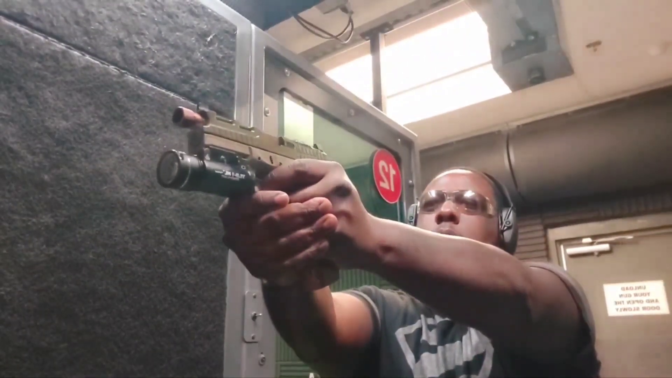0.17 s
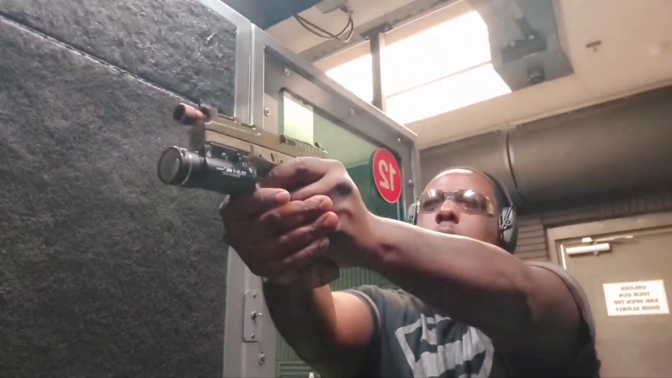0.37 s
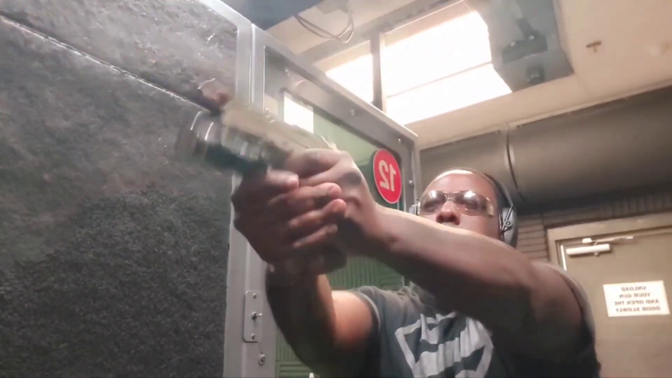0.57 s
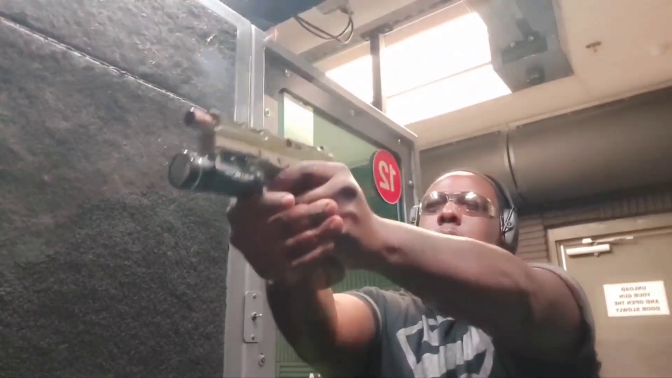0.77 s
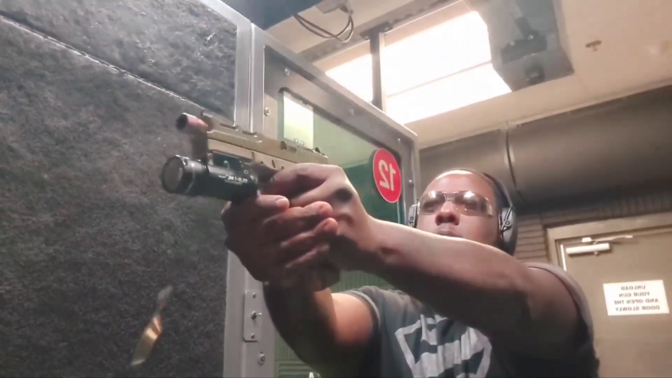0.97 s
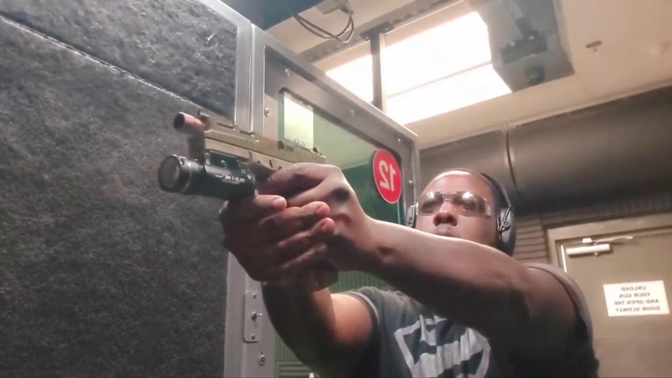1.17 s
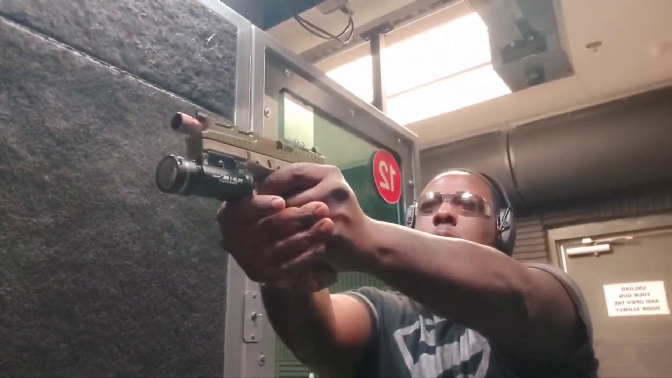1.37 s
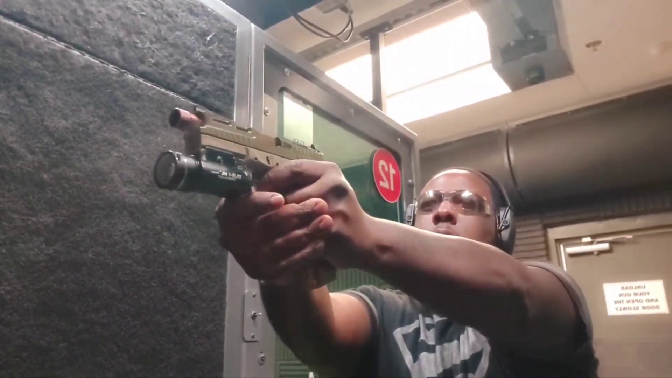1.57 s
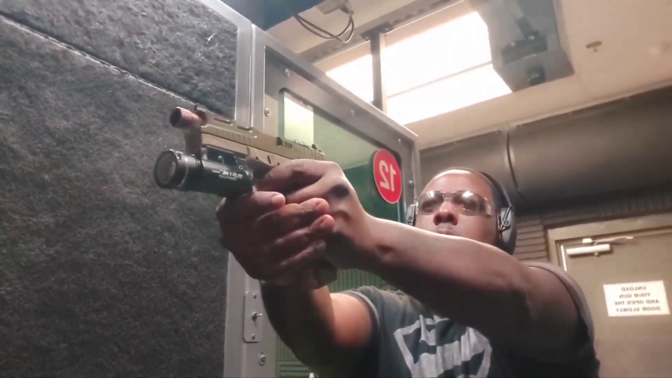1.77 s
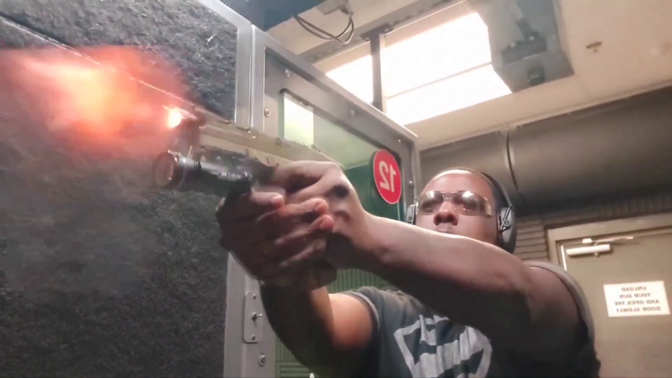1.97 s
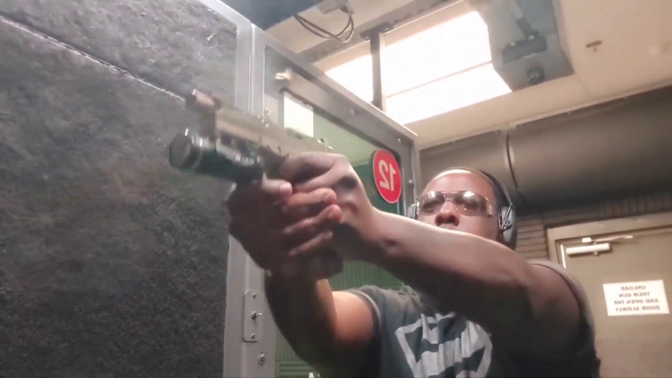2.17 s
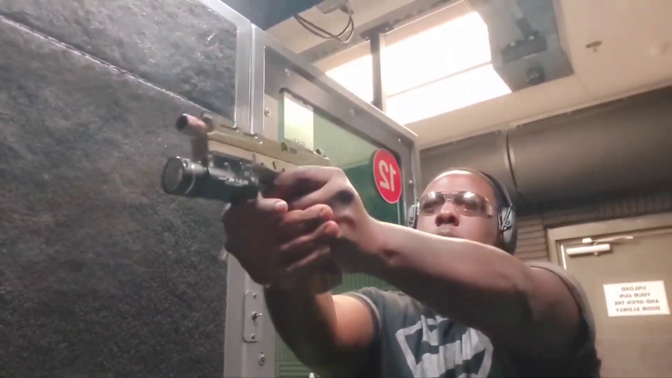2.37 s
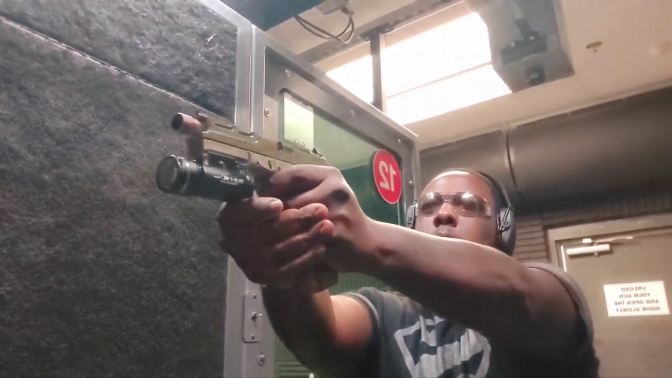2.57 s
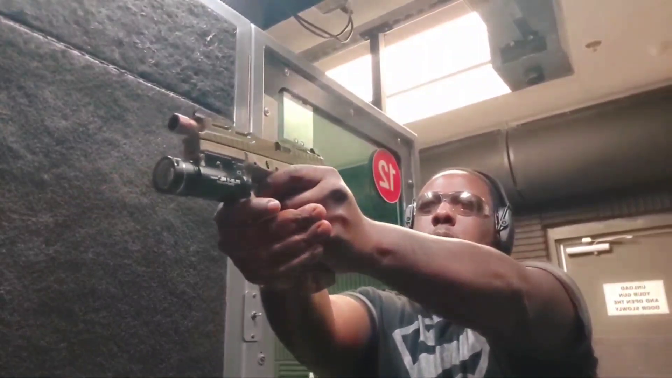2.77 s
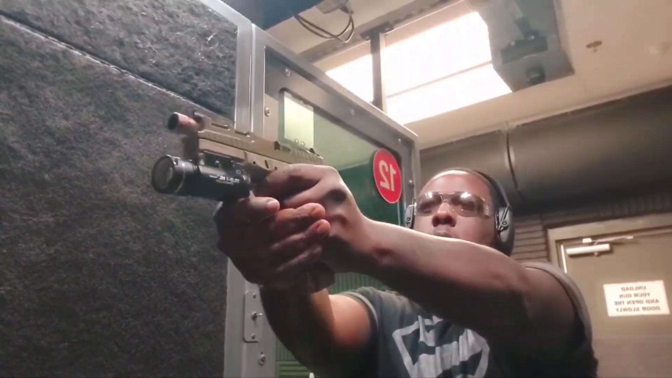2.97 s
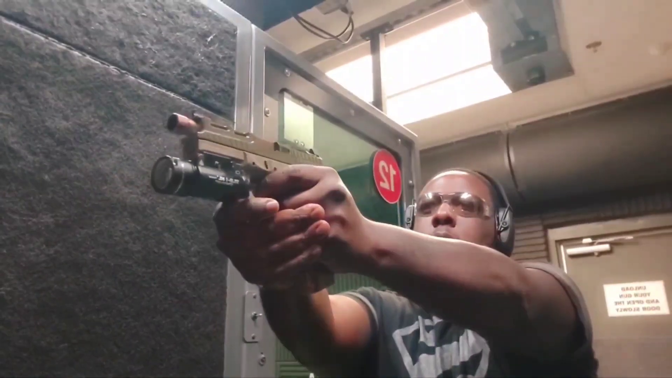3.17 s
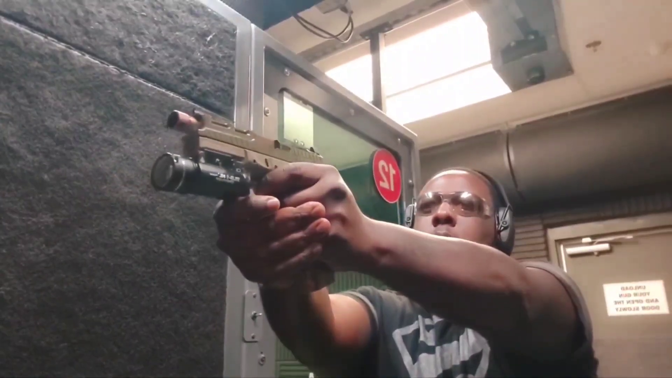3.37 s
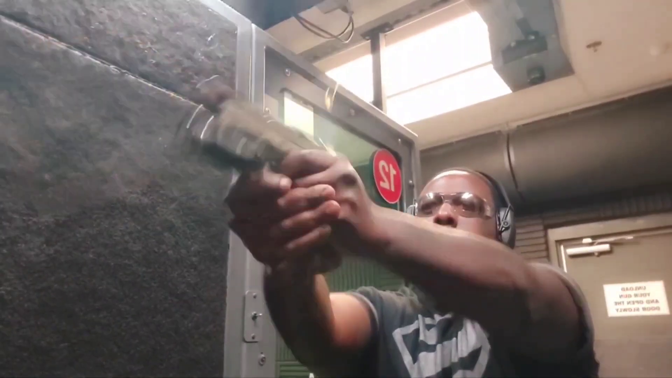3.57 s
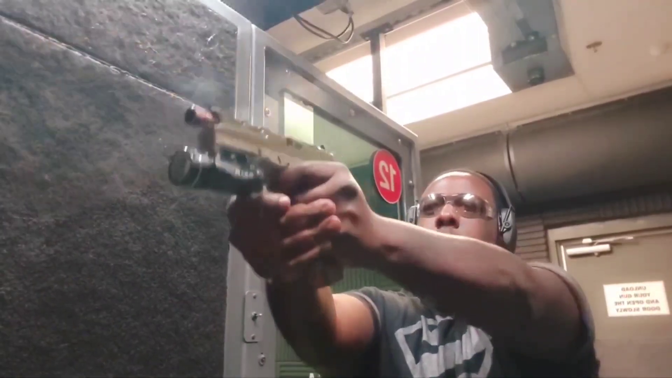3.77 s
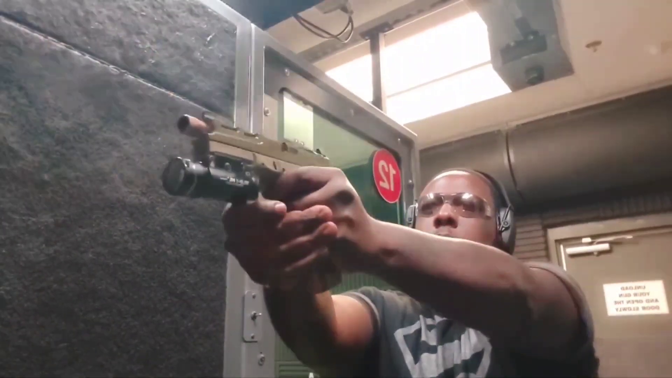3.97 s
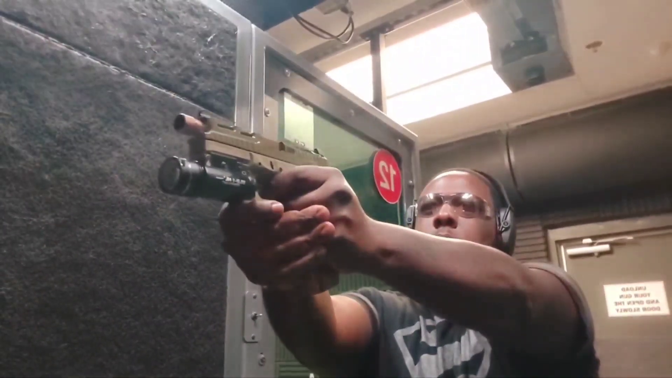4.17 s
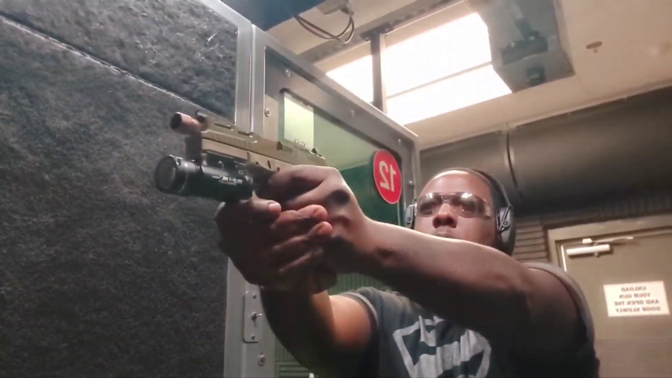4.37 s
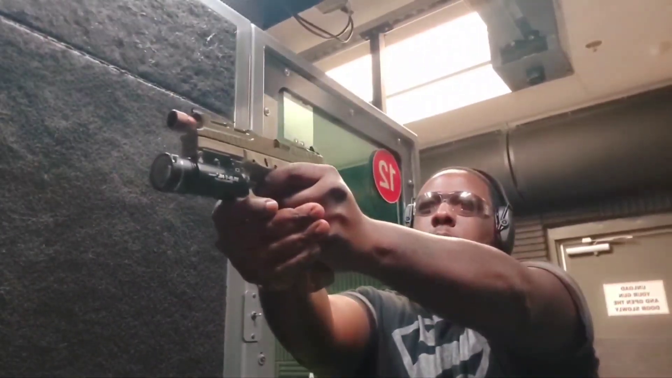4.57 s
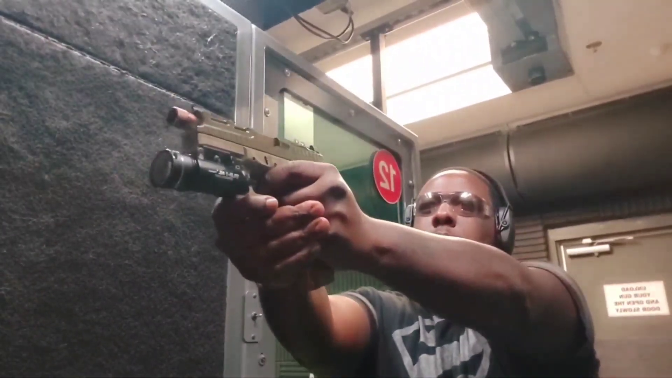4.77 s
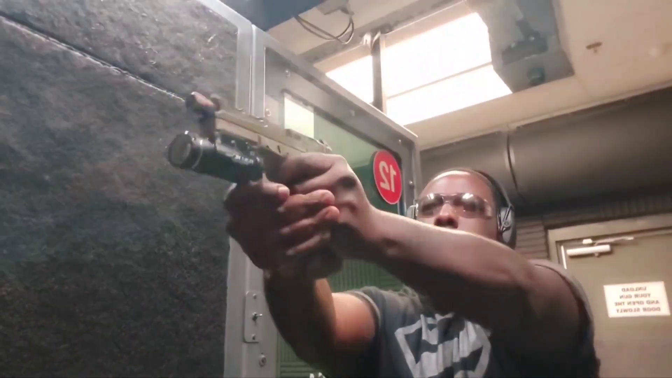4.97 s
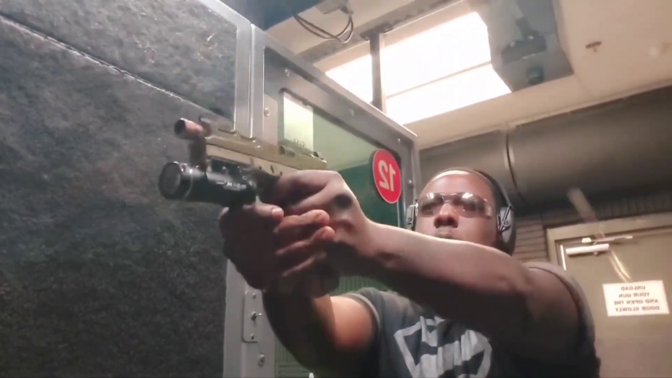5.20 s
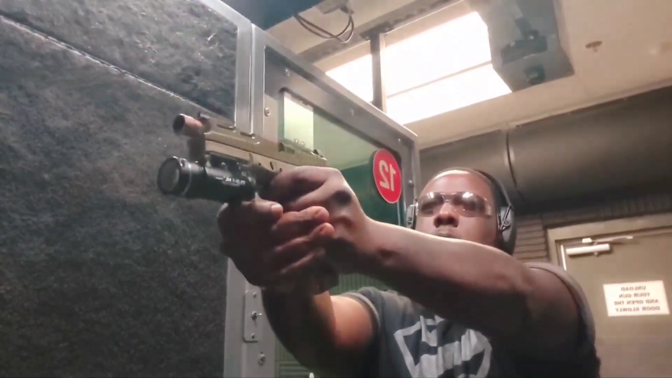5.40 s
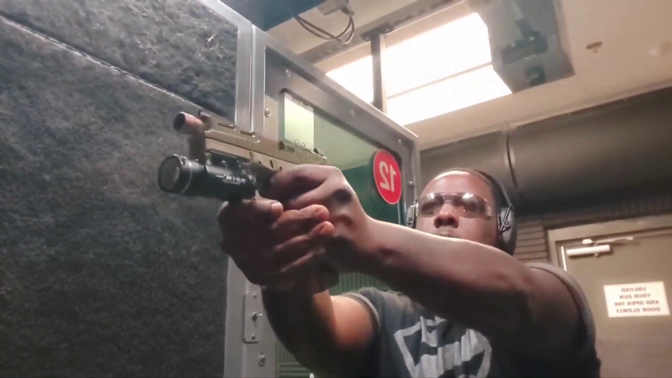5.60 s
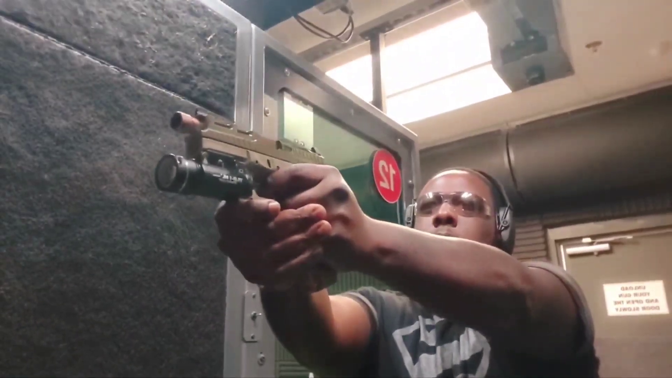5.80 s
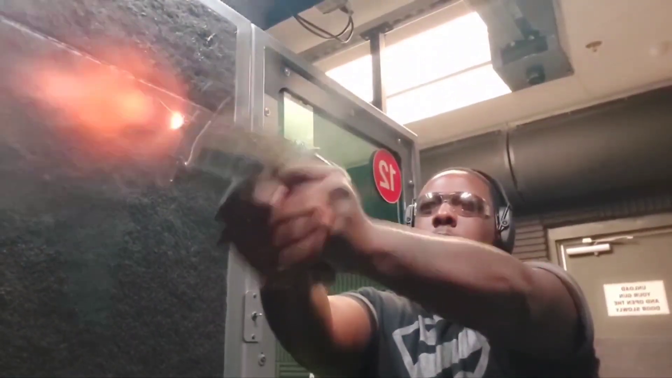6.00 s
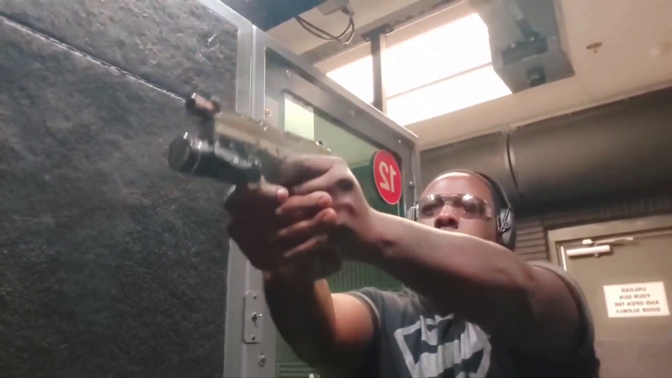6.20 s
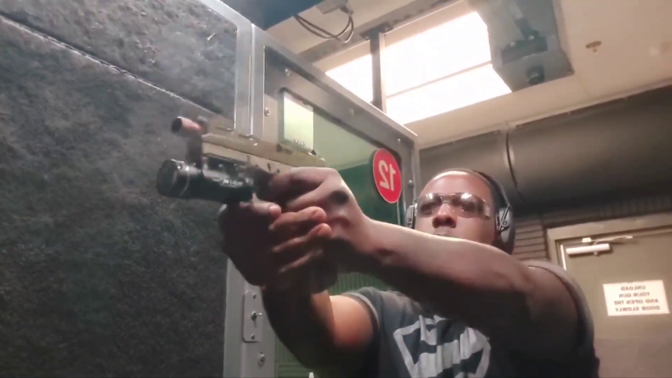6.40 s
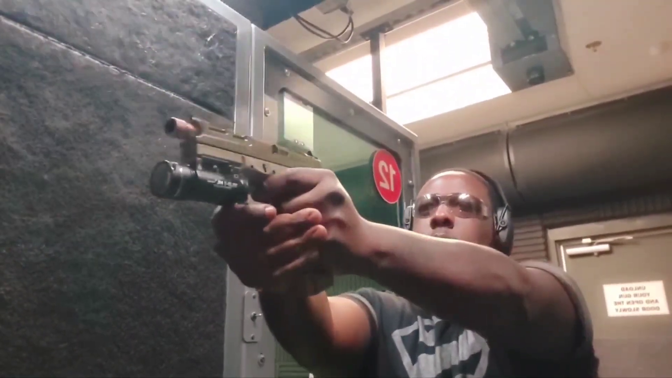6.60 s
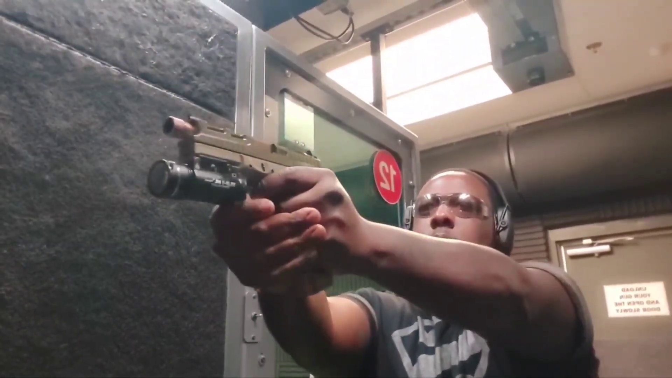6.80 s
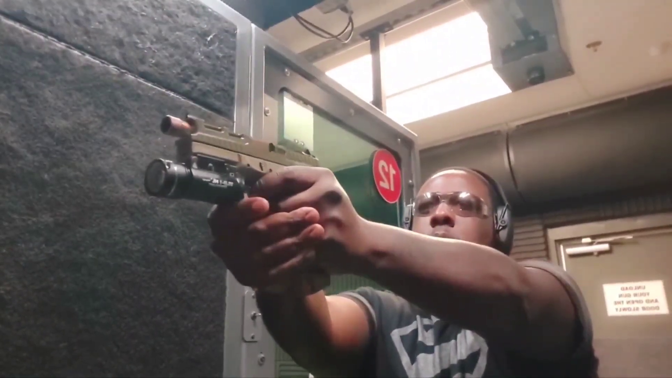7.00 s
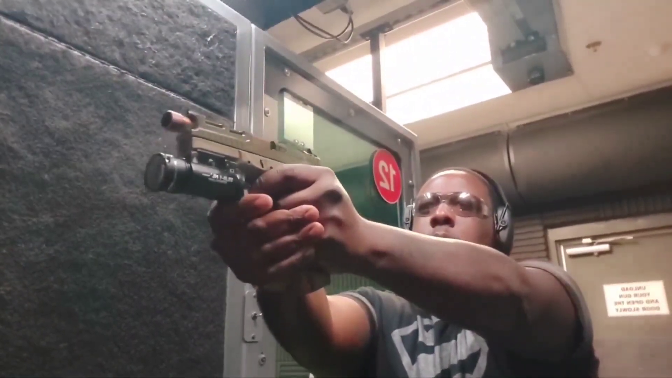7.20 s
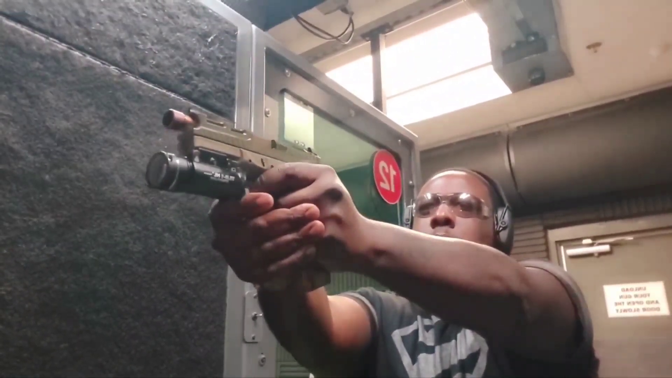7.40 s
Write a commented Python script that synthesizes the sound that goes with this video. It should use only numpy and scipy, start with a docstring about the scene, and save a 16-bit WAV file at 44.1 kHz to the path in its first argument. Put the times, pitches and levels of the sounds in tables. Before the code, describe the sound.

Slow, evenly paced handgun fire indoors: five harsh, overloaded blasts with rolling echoes, small metallic clicks, bouncing casings and a low fan drone.

```python
"""Five single pistol shots crack close by in a booth of an indoor range and roll down the hall. Each blast is
ringing noise with a rasp at the overloaded left microphone; it briefly deafens the right one. The hall is dense
noise echoes, split into bands that die at their own rates; the bass starts weak, then rises. Around the shots
the trigger clicks (noise snaps) and brass bounces and rings (fluttering modes). Ventilation hums steadily
(coloured noise, wavering tones), heard more faintly after each shot, then louder again."""
import sys
import numpy as np
from scipy import signal
from scipy.fft import rfft, irfft, next_fast_len
from scipy.io import wavfile
from scipy.ndimage import uniform_filter1d

SR = 44100
rng = np.random.default_rng(int(sys.argv[2]) if len(sys.argv) > 2 else 0)


def master(y):
    """Save y as 16-bit WAV."""
    cut = np.clip(np.atleast_2d(y).T, -1, 1)
    pcm = np.round(cut * 32767)  # scale
    wavfile.write(sys.argv[1], SR, pcm.astype(np.int16))


N = 328545

# the shots: (time [s], relative level [dB], initial dropout of the right microphone [dB])
SHOT_LIST = [(0.623, 0.5, 8.5), (2.0950, 1, 19), (3.6270, 1, 23), (4.9433, 1, 11.5), (6.1101, 0.8, 27.5)]
# how alike the sound is at the two microphones: (frequency [Hz], likeness [0-1])
MIC_LIKENESS = [(110, .95), (200, 0.05), (400, 0.7), (800, 0.16), (1300, 0.84), (2400, 0)]
RIGHT_LEAD = 24  # samples by which noise and echoes reach the right microphone first


def gain_of(db):
    """Turns decibels into an amplitude factor."""
    return 10 ** (np.asarray(db) / 20)


def evened(x):
    """Scales to rms 1."""
    return x / np.sqrt(np.mean(x ** 2) + 1e-20)


def bins(x):
    """Gives the frequencies in the spectrum of x, in Hz."""
    return np.fft.rfftfreq(x.shape[-1], 1 / SR)


def read(points, hz):
    """Reads a table on a log-frequency axis."""
    f, value = np.transpose(points)
    return np.interp(np.log(hz + 1), np.log(f + 1), value)


def dying(t, t60):
    """Falls exponentially, by 60 dB in t60 seconds."""
    return np.exp(-np.log(1000) * t / np.maximum(t60, 1e-3))


def add(mix, s, sound):
    """Adds a stereo sound to the mix at s seconds."""
    part = mix[:, round(s * SR):][:, :sound.shape[-1]]
    part += sound[:, :part.shape[-1]]


def pink(white):
    """Tilts the spectrum of white noise to unit power in every octave, easing off below 20 Hz."""
    hz = bins(white)
    return rfft(white) * np.sqrt(SR / 2 / np.log(2) * hz / (hz ** 2 + 20 ** 2))


def coloured(white, points):
    """Gives white noise the stated level in each octave."""
    return irfft(pink(white) * gain_of(read(points, bins(white))), white.shape[-1])


def hiss(points, shape):
    """Makes steady noise with the stated level in each octave."""
    return coloured(rng.standard_normal(shape), points)


def blend(a, b, likeness):
    """Mixes unrelated noises so that the result resembles a by the given likeness."""
    c = np.clip(read(likeness, bins(a)), 0, 1)
    return irfft(c * rfft(a) + np.sqrt(1 - c ** 2) * rfft(b), a.shape[-1])


def heard_air_level(low_after_s=.1):
    """Heard level of the air in dB: low after each shot, then rising steadily."""
    low_db, low_until_s, rise_db_per_s = -1.6, 1.225, 16.5  # low_until_s counts from the shot
    first_rise_s = 0.24  # before the first shot
    t = np.arange(N) / SR
    rise_from = np.full(N, first_rise_s)
    for s, _, _ in SHOT_LIST:
        rise_from[t > s + low_after_s] = s + low_until_s
    return low_db + rise_db_per_s * np.maximum(t - rise_from, 0)


def ventilation(waver, wander=0.52):
    """Rumbling ducts and rushing air as noise, plus fan tones that waver in level and phase."""
    # air noise before heard_air_level:
    # (frequency [Hz], left density [dB per Hz], right density [dB per Hz])
    air_colour = [(20, -99.5, -110), (42.6, -78.5, -103.5), (79.9, -72, -94.5), (160, -77, -92),
                  (280, -79, -87), (420, -83, -81), (734, -95, -94.5), (1080, -91, -91.5),
                  (1970, -101, -99), (2993, -109, -103), (5200, -129, -106), (8500, -135, -114),
                  (9700, -138, -128), (16000, -140, -131)]
    # fan tones before heard_air_level: (frequency [Hz], left level [dB], right level [dB])
    fan_tones = [(132, -58.5, -88), (392, -63, -64), (1114, -77, -78.5)]
    a, b = rng.standard_normal((2, next_fast_len(N, real=True)))
    hz, t = bins(a), np.arange(N) / SR
    air_db = np.array([read(np.array(air_colour)[:, [0, side]], hz) for side in (1, 2)])
    pair = np.array([a, blend(a, b, MIC_LIKENESS)])
    spectrum = rfft(pair) * gain_of(air_db) * np.sqrt(SR / 2)
    air = irfft(spectrum, len(a))[:, :N]
    air[1] = np.roll(air[1], -RIGHT_LEAD)
    knots = np.arange(0, N / SR + 1, 1 / 10)  # ten random turns a second
    for f, left_db, right_db in fan_tones:
        swell, drift = (np.interp(t, knots, rng.standard_normal(len(knots))) for _ in range(2))
        tone = np.sqrt(2) * (1 + waver * swell) * np.sin(2 * np.pi * f * t + wander * drift)
        air += gain_of([[left_db], [right_db]]) * tone
    return air


def struck(x):
    """Scales a small hit to rms 1 over its first 30 ms."""
    return x / np.sqrt(np.mean(x[:, :round(.03 * SR)] ** 2))


def tick(t, t60, room_db, bright_db=0, room_t60=0.43, snap=1.8, snap_t60=0.0041):
    """A sharp noise snap, its scatter in the booth and a faint tail; bright_db tilts it per octave."""
    # tone colour of a tick: (frequency [Hz], relative level in each octave [dB])
    tick_colour = [(1500, -27), (3400, -16.5), (4800, 0.5), (8000, -0.5), (9500, -1.5), (12000, 4.5),
                   (15000, 3)]
    fall = snap * dying(t, snap_t60) + dying(t, t60) + gain_of(room_db) * dying(t, room_t60)
    colour = [(hz, db + bright_db * np.log2(hz)) for hz, db in tick_colour]
    return struck(hiss(colour, (2, len(t))) * fall)


def ring(modes, t, blur_hz, blur):
    """Dying modes; the case spins and the walls scatter its sound, so each one flutters."""
    out = np.zeros((2, len(t)))
    r = np.exp(-np.pi * abs(blur_hz) / SR)
    for hz, db, t60 in modes:
        kicks = rng.standard_normal(out.shape) + 1j * rng.standard_normal(out.shape)
        flutter = signal.lfilter([np.sqrt((1 - r * r) / 2)], [1, -r], kicks)
        start_phase = np.exp(2j * np.pi * rng.random((2, 1)))
        tone = np.exp(2j * np.pi * hz * t) * start_phase
        out += gain_of(db) * dying(t, t60) * (tone * (1 + blur * flutter)).real
    return struck(out)


def brass(t, tick_db, clink_db, ring_db):
    """One strike of a case: a tick, a short clink and the thin ring of its mouth."""
    # modes of the clink: (frequency [Hz], relative level [dB], t60 [s])
    clink_modes = [(4740, -13, .06), (4900, -6, .07), (5260, -0.5, 0.21), (5000, -4.5, 0.15),
                   (5400, 0.5, 0.11), (5500, 4.5, 0.087), (5800, -13, 0.073), (6310, -13, 0.058)]
    # modes of the case mouth: (frequency [Hz], relative level [dB], t60 [s])
    mouth_modes = [(10200, 9.5, 0.35), (10800, -11, .2), (10400, 1, 0.32)]
    snap = tick(t, t60=.11, room_db=-20.5, snap=.4)
    clink = ring(clink_modes, t, blur_hz=297.6, blur=1.5)
    mouth = ring(mouth_modes, t, blur_hz=30, blur=.9)
    return gain_of(tick_db) * snap + gain_of(clink_db) * clink + gain_of(ring_db) * mouth


def bounces(s, db, hop_s, loss_db, lasts_s, count=7):
    """Times and levels of a case's bounces: each hop is shorter, each level changes by -loss_db."""
    hop_share = 0.96  # each hop lasts this share of the one before
    k = np.arange(count)
    hops = hop_s * hop_share ** k
    after_s = np.cumsum(hops) - hops
    return np.c_[s + after_s, db - loss_db * k][after_s <= lasts_s]


def small_metal(left_db=-17):
    """Trigger clicks and knocking, bouncing brass, which the right microphone hears best."""
    # levels in these three tables are those at the right microphone
    # trigger and action clicks: (time [s], level [dB], brightness [dB per octave])
    click_list = [(.595, -68.5, 5), (.992, -79, 19), (2.393, -48, -6), (2.988, -50.5, 12),
                  (4.1177, -47.5, -6), (5.4066, -47.5, -6.5), (6.368, -57, -10), (6.4797, -47, -7)]
    # single sharp knocks of brass: (time [s], tick level [dB], clink level [dB], mouth ring level [dB])
    knock_list = [(.242, -56.5, -66, -65), (1.495, -54, -48.5, -59), (1.985, -54.5, -50, -64),
                  (3.015, -77, -78, -68), (3.555, -54.5, -64, -52), (4.473, -61, -57, -54.5),
                  (4.7564, -69.5, -67, -65), (5.729, -49, -51, -64), (7.0262, -46.5, -51.5, -67)]
    # ejected cases: (landing time [s], mouth ring level [dB], first hop [s], loss per bounce [dB],
    # hopping time [s])
    case_list = [(1.0924, -62.5, 0.12, 6.5, .24), (2.4923, -59.5, .096, 2, .4),
                 (4.055, -77, 0.11, 0.5, .16), (5.3278, -60, .138, 3.5, .55), (6.419, -70, 0.12, -1.5, .25)]
    bounce_tick_db, bounce_clink_db = -12, -5.5  # relative to the ring of the case mouth
    t, out = np.arange(16000) / SR, np.zeros((2, N))
    for s, db, bright_db in click_list:
        add(out, s, gain_of(db) * tick(t, t60=0.091, room_db=-24.5, bright_db=bright_db))
    for s, tick_db, clink_db, ring_db in knock_list:
        add(out, s, brass(t, tick_db, clink_db, ring_db))
    short_t = t[:len(t) // 2]
    for case in case_list:
        for s, db in bounces(*case):
            add(out, s, brass(short_t, db + bounce_tick_db, db + bounce_clink_db, db))
    return out * gain_of([[left_db], [0]])


def echoes(t, lumps_db=1.8, lump_s=0.008):
    """Dense echoes that arrive in clusters, at the right microphone just before the left."""
    x = rng.standard_normal((2, len(t)))
    early = np.sqrt(t + .01) * dying(t, .7)
    for _ in range(3):  # the loud early part holds all pitches evenly
        power = uniform_filter1d(abs(rfft(x * early)) ** 2, size=25) / np.sum(early ** 2)
        x = irfft(rfft(x) / np.sqrt(power))
    clusters_db = lumps_db * np.interp(t / lump_s, np.arange(400), rng.standard_normal(400))
    right = np.roll(blend(x[0], x[1], MIC_LIKENESS), -RIGHT_LEAD)
    return np.array([x[0], right]) * gain_of(clusters_db)


def hall(patterns, t, build_s=0.042, deaf_s=0.064, knee=1.1):
    """The bass starts weak and rises within the first tens of ms; each band dies fast, then lingers in the long
    lanes."""
    # the colour of the hall, relative to the shot and before the resonances:
    # (frequency [Hz], left level in each octave [dB], right level in each octave [dB])
    hall_colour = [(30.5, -54, -67.5), (60.5, -32.5, -46), (125, -14, -29.5), (250, -12, -21.5),
                   (480, -11, -8), (944, -7.5, -6.5), (1850, -14.5, -14), (2424, -17, -13),
                   (4000, -21.5, -13), (5900, -37, -13), (9700, -64, -23), (11300, -31, -17),
                   (16000, -47, -17.5)]
    # resonances and gaps of hall and booth: (frequency [Hz], width at half the dB [Hz], gain [dB])
    hall_modes = [(67.7, 7.2, 12), (107.1, 13, 7), (135, 39, 8), (183, 31, -11.5), (202.3, 16, 9),
                  (270.6, 82, 4), (333, 15, -6), (386, 32, 6), (431.5, 25, 7), (448, 25, 7.5),
                  (498.7, 36, 5), (582, 60, 4), (750, 17, 3.5), (790, 51, -4.5), (883, 32, 3), (930, 29, 2),
                  (988, 5.7, 9), (1132.5, 19, 8.5), (1190, 30, 5), (1280, 160, 3), (1528, 12, 4.5),
                  (1733, 62, 5), (1892, 26, 7.5), (2057, 32, 4.5)]
    # late tail from the long lanes, relative to the hall: (frequency [Hz], level [dB])
    lane_levels = [(60, -27), (125, -18), (450, -36.5), (1000, -29), (1850, -22.5), (2400, -31.5),
                   (3700, -25), (10000, -33.5)]
    # loss at the right microphone just after a blast: (frequency [Hz], loss [dB])
    deafness = [(60, 16), (125, 30), (400, 22), (900, 28.5), (2400, 8.5), (12000, 1)]
    hall_t60_s, dull_hz = .56, 33400  # the air shortens the hall's decay, to half at dull_hz
    boom_s, boom_hz = 1.3, 84.6  # added decay time in the deep bass, half of it at boom_hz
    build_db, build_hz = 36, 258  # the deepest bass starts this far down; half as far at build_hz
    lanes_t60_s, lanes_dull_hz = 2.003, 7700  # the late tail's decay, halved at lanes_dull_hz

    hz, out = bins(t), np.zeros(patterns.shape, np.float32)
    modes_db = sum(db / (1 + (2 * (hz - f) / width) ** 2) for f, width, db in hall_modes)
    z = (pink(patterns) * gain_of(modes_db)).astype(np.complex64)
    centres = [row[0] for row in hall_colour]
    unbuilt, deaf = np.exp(-t / build_s), np.exp(-(t / deaf_s) ** knee)
    # each band fades into its neighbours
    for share, (f, left_db, right_db) in zip(np.eye(len(hall_colour)), hall_colour):
        band = irfft(z * np.float32(read(np.c_[centres, share], hz)))
        near_t60 = hall_t60_s / (1 + f / dull_hz) + boom_s / (1 + (f / boom_hz) ** 3)
        near = dying(t, near_t60)
        lanes = gain_of(read(lane_levels, f)) * dying(t, lanes_t60_s / (1 + f / lanes_dull_hz))
        fall = np.hypot(near, lanes) * gain_of(-build_db / (1 + f / build_hz) * unbuilt)
        right_gain = gain_of(right_db - read(deafness, f) * deaf)
        out += band * np.float32([fall * gain_of(left_db), fall * right_gain])
    return out


def shots(blast_t60=0.023, blast_db=5, rasp_t60=0.22, rasp_db=-1, spiky=1.4,
          slap_db=-4, slap_t60=0.16, dropout_s=0.033):
    """Gun and walls stay put, so every shot wakes nearly the same echoes."""
    # how alike the echoes of two shots are: (frequency [Hz], likeness [0-1])
    shot_likeness = [(100, 0.96), (1200, 0.86), (3500, 0.5), (9000, 0.4)]
    # muzzle blast ringing in the booth: (frequency [Hz], relative level in each octave [dB])
    blast_colour = [(100, -41), (400, -37), (800, -1), (1100, -11), (1600, -17.5), (3000, -25.5),
                    (8000, -48)]
    # rasp of the overloaded microphone: (frequency [Hz], relative level in each octave [dB])
    rasp_colour = [(500, -33.5), (2000, -12.5), (4000, -16), (6000, -25), (8000, -43.5), (9200, -47.5),
                   (10500, -47.5), (12000, -18.5), (16000, -24.5)]
    length = 65536  # samples in one shot
    t, out = np.arange(length) / SR, np.zeros((2, N))
    booth = gain_of(blast_db) * hiss(blast_colour, length) * dying(t, blast_t60)
    own_echoes = rng.standard_normal((len(SHOT_LIST), 2, length))
    patterns = blend(echoes(t), own_echoes, shot_likeness)
    since_slap = t - .048
    slap = gain_of(slap_db) * (since_slap > 0) * dying(abs(since_slap), slap_t60)  # a hard wall answers
    overload = gain_of(rasp_db) * (dying(t, rasp_t60) + slap)
    for (s, db, dropout_db), shot in zip(SHOT_LIST, hall(patterns, t)):
        left = shot[0] + booth
        right = shot[1] * gain_of(-dropout_db * np.exp(-t / dropout_s))
        # the overloaded left microphone rasps at the pressure peaks
        peaks = abs(left) / np.sqrt(abs(uniform_filter1d(left ** 2, size=900)) + 1e-12)
        spikes = rng.standard_normal(length) * evened(peaks ** spiky)
        rasp = overload * coloured(spikes, rasp_colour)
        add(out, s, gain_of(db) * np.array([left + rasp, right]))
    return out


def scene():
    """Ventilation, small metal and the shots."""
    air = ventilation(waver=0.2) * gain_of(heard_air_level())
    return air + small_metal() + shots()


def record(dry):
    """The microphones flatten the highest peaks; then a low-pass limits the band."""
    ceiling, edge_hz = .9, 15900
    flattened = dry / (1 + (dry / ceiling) ** 4) ** (1 / 4)
    low_pass = signal.firwin(511, edge_hz, window=("kaiser", 9), fs=SR)
    return signal.oaconvolve(flattened, low_pass[None], "same")


dry = scene()
out = record(dry)
master(out)
```